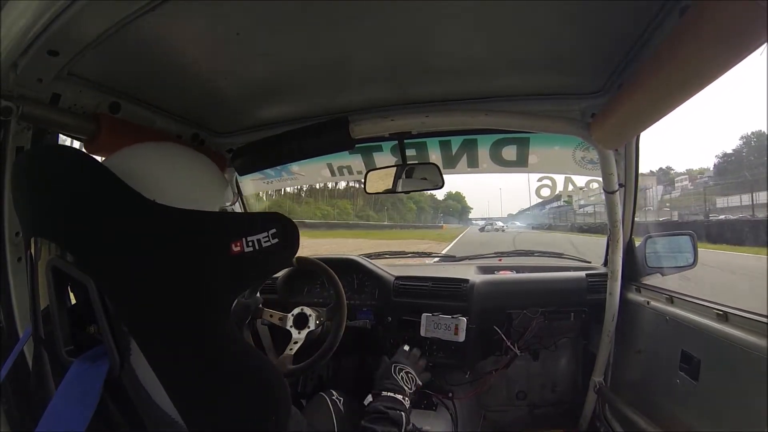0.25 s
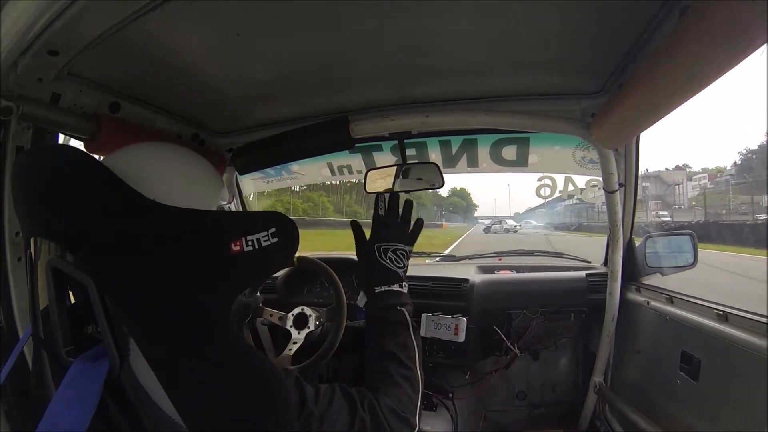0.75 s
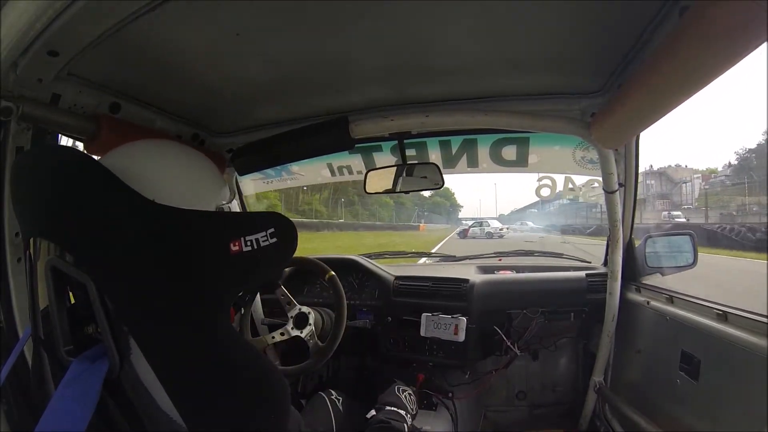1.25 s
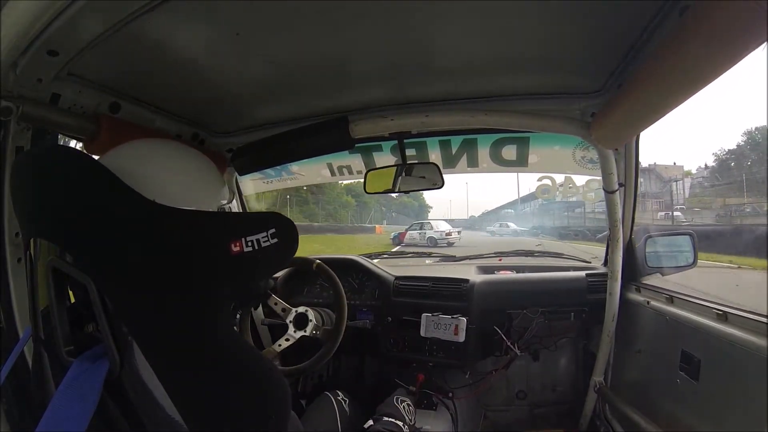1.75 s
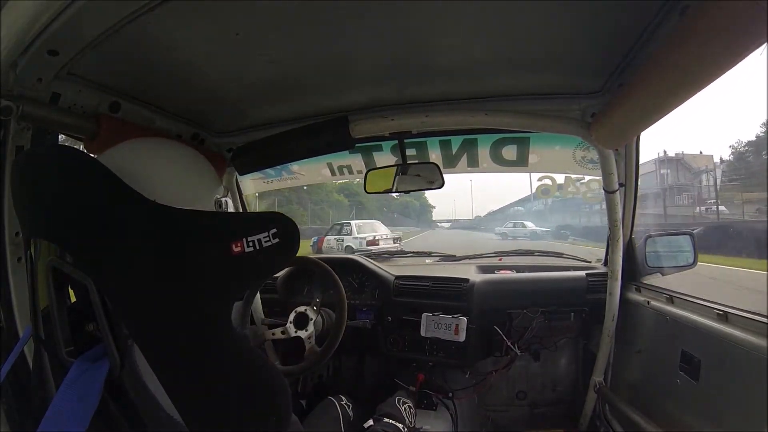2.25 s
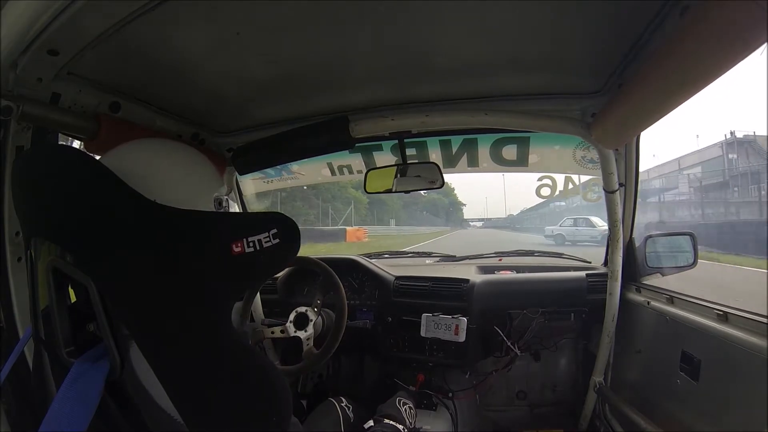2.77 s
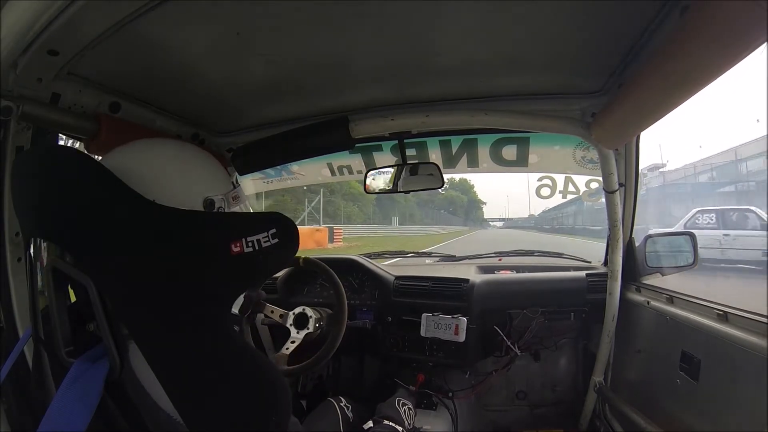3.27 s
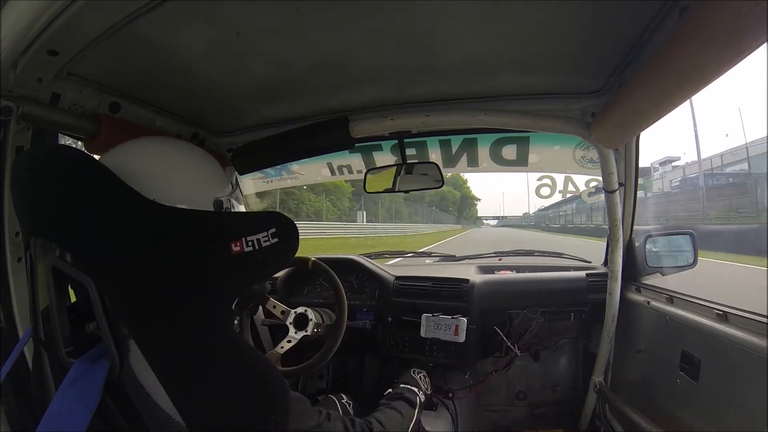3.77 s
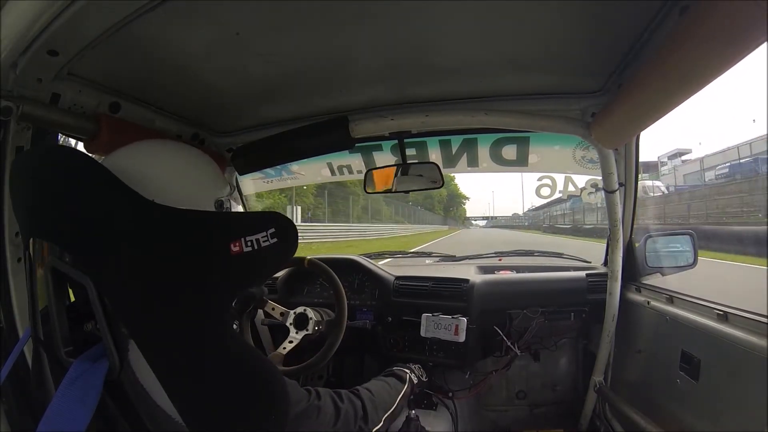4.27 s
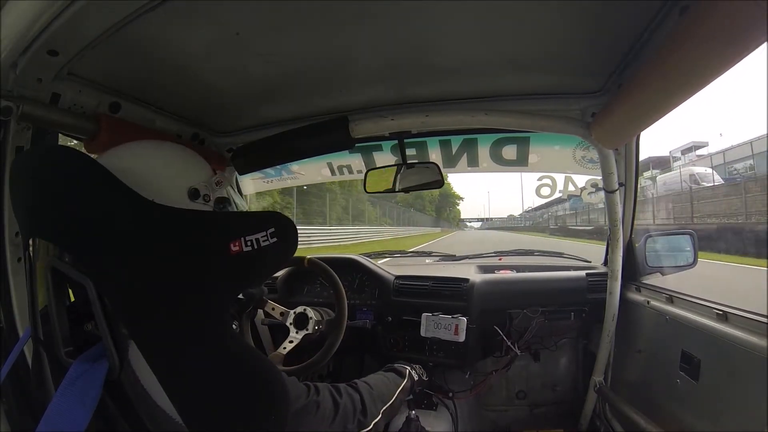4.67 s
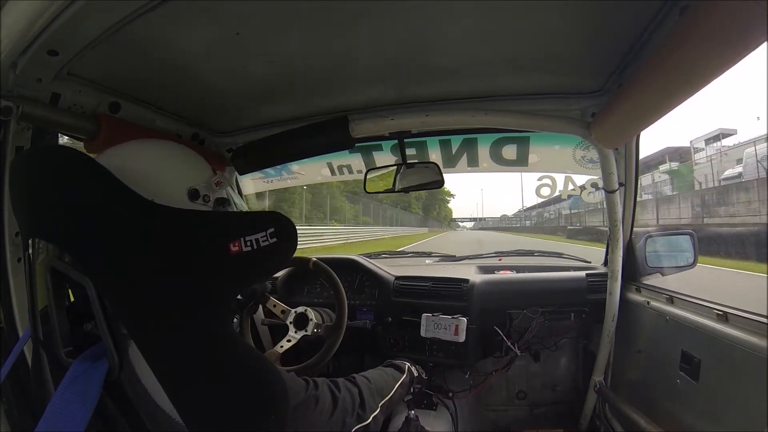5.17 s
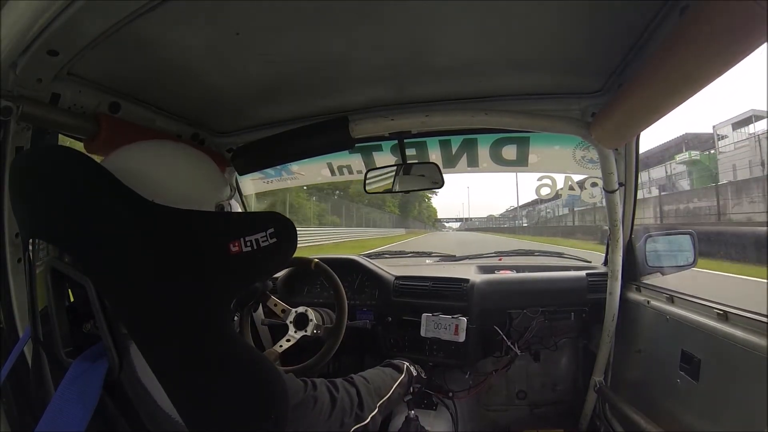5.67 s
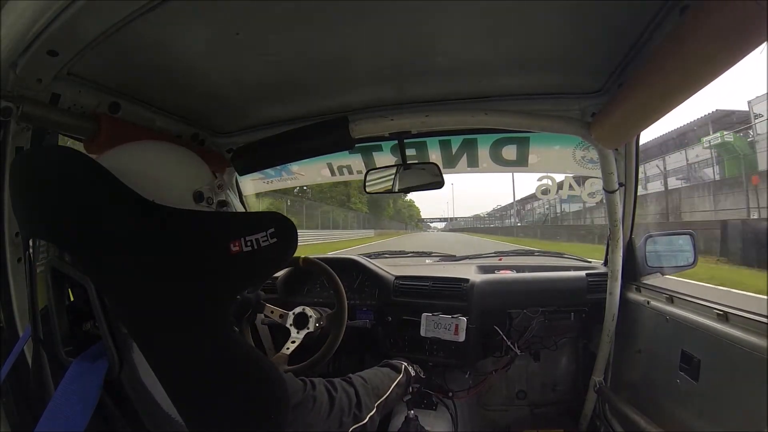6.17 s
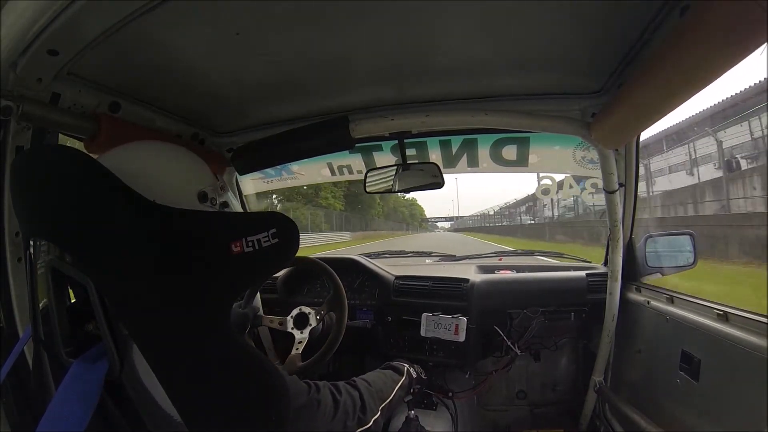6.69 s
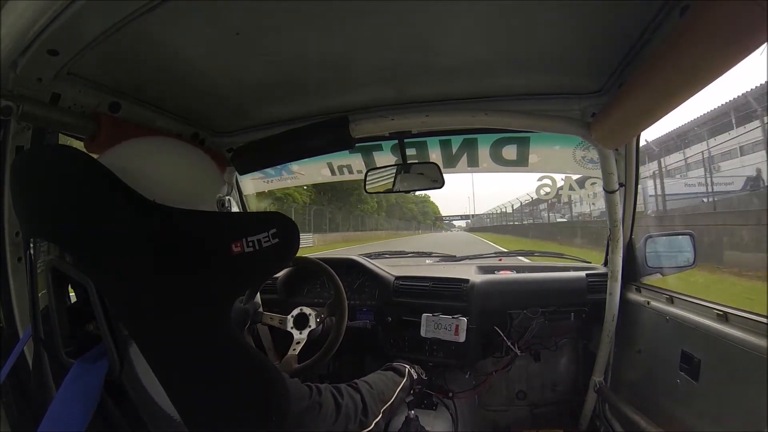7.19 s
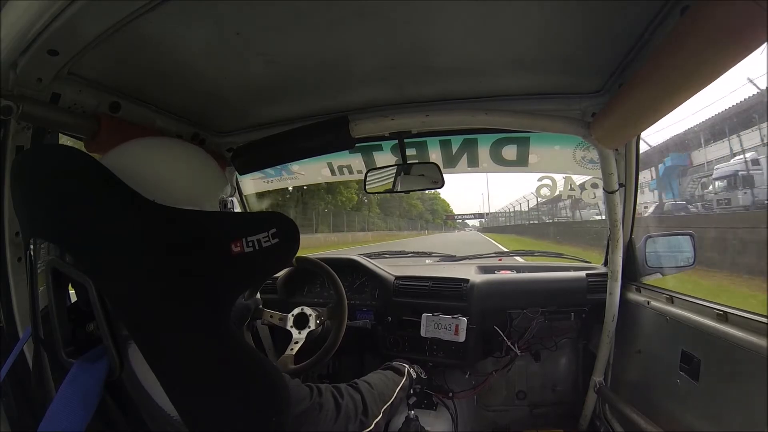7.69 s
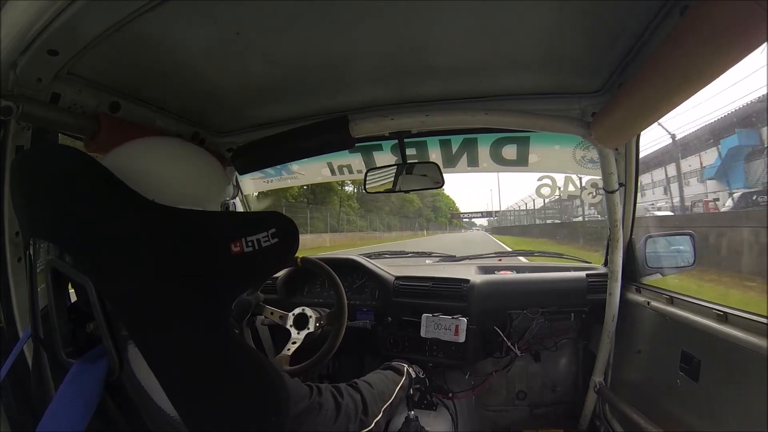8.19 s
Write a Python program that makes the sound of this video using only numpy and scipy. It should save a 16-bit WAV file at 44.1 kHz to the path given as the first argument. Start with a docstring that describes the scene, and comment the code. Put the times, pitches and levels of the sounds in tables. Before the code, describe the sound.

A booming race engine winds down under heavy road rumble and gusts of wind, picked up inside the bare, ringing cabin. After a faint, thin brake squeal and one dull knock, the throttle opens and grit strikes the wheel arches in sharp ticks and clangs. The revs jump, dip for a gear change, then climb steadily with a bright clatter as the road noise eases and everything fades away.

```python
"""A six-cylinder race engine, heard inside the stripped car: it slows for a bend, picks up, blips,
changes gear and pulls away hard. Exhaust orders sweep the cabin's standing waves. Tyre roar and a
bright rattle (tyre hiss while slowing, then engine clatter) ring the bare panels while wind buffets
through the open window. Grit strikes the wheel arches, a brake squeals briefly and the driveline
knocks once. The sound fades out at the end."""
import sys
import numpy as np
from scipy import signal
from scipy.fft import rfft, irfft, next_fast_len
from scipy.io import wavfile
from scipy.ndimage import uniform_filter1d

SR = 44100
rng = np.random.default_rng(int(sys.argv[2]) if len(sys.argv) > 2 else 0)


def waveform_to_disk(signal):
    """Save audio, clipped to [-1, 1], as 16-bit WAV at the path in sys.argv[1]."""
    frames = np.transpose(np.atleast_2d(signal))
    scaled = np.clip(frames, -1, 1) * 32767
    samples = np.round(scaled).astype(np.int16)
    wavfile.write(sys.argv[1], SR, samples)


N = 372204
T = np.arange(N) / SR


def undb(db):
    """Decibels to gain."""
    return 10 ** (np.asarray(db) / 20)


def unit(x):
    """Scale to rms 1."""
    return x / np.sqrt(np.mean(x ** 2))


def curves(table):
    """Each column of a table, interpolated over time."""
    times_s, *columns = np.transpose(table)
    return [np.interp(T, times_s, column) for column in columns]


def wander(rate_hz):
    """Smooth random drift, rms 1."""
    count = int(8 * rate_hz * N / SR) + 2
    f = np.arange(count // 2 + 1) * SR / N
    slow = irfft(rfft(rng.standard_normal(count)) / (1 + (f / rate_hz) ** 4), 4 * count)
    return np.interp(T, np.linspace(0, N / SR, len(slow)), unit(slow))


def swell(start_s, end_s):
    """Rounded rise and fall."""
    return np.sqrt(np.abs(np.sin(np.pi * np.clip((T - start_s) / (end_s - start_s), 0, 1))))


def strike(at_s, t60_s, rise_s):
    """Impact envelope: linear rise, exponential decay."""
    age_s = np.maximum(T - at_s, 0)
    return np.minimum(age_s / rise_s, 1) * np.exp(-np.log(1000) * age_s / t60_s)


def peaks_db(f, resonances):
    """Summed resonance peaks and dips at frequencies f."""
    return sum(db / (1 + (2 * (f - centre_hz) / width_hz) ** 2) for centre_hz, width_hz, db in resonances)


def response_db(f, spectrum, resonances):
    """Smooth spectrum plus resonances at frequencies f."""
    hz, db = np.transpose(spectrum)
    return np.interp(np.log(f + 1), np.log(hz), db) + peaks_db(f, resonances)


def noise(spectrum, resonances=(), flutter=1):
    """White noise times flutter, through a minimum-phase filter; rms 1."""
    size = next_fast_len(N + SR // 2, real=True)
    f = np.arange(size // 2 + 1) * SR / size
    cepstrum = irfft(np.log(undb(response_db(f, spectrum, resonances))), size)
    cepstrum[1:size // 2] *= 2
    cepstrum[size // 2 + 1:] = 0
    drive = rng.standard_normal(N) * flutter
    return unit(irfft(rfft(drive, size) * np.exp(rfft(cepstrum)), size)[:N])


# Engine speed: t/s, firing rate/Hz
FIRING_RATE = [(0, 169.8), (.75, 140.8), (1.55, 120.6), (1.8, 109.7), (2.2, 108.8), (3.6, 123.5),
               (3.8, 138.2), (3.95, 137.3), (4.08, 132.3), (4.15, 137.9), (4.22, 175.4), (4.35, 198),
               (4.5, 212), (4.6, 205.6), (4.68, 187.2), (4.75, 179), (4.85, 185.9), (5, 188.8),
               (6.75, 233.4), (8.44, 272.5)]

def crank(lumpy_hz=0.6, jerk_s2=6e-5):
    """Firing rate and running firing count; rotation is least even at low or fast-changing revs."""
    firing_hz, = curves(FIRING_RATE)
    slew_hz_per_s = uniform_filter1d(np.abs(np.gradient(firing_hz)) * SR, SR // 8)
    wobble = lumpy_hz / firing_hz + jerk_s2 * slew_hz_per_s
    return firing_hz, np.cumsum(firing_hz * (1 + wobble * wander(30))) / SR


# Throttle presses: press/s, release/s, opening/0-1, bark/dB
PEDAL = [(2.11, 3.37, 0.71, 3.5), (3.66, 3.48, 0.7, 4.5), (4.175, 4.54, 0.56, 5), (4.66, 8.6, 0.84, -1.5)]

def throttle(down_s=0.04, up_s=0.22, bark_s=0.2):
    """Throttle opening, and the brief bark in dB after each press."""
    load, bark_db = 0, 0
    for press_s, release_s, opening, db in PEDAL:
        pressed = np.clip((T - press_s) / down_s, 0, 1)
        held = np.clip(1 - (T - release_s) / up_s, 0, 1)
        load += opening * pressed * held
        bark_db += db * swell(press_s, min(press_s + bark_s, release_s + up_s))
    return load, bark_db


# Strongest exhaust orders: order/(firing rate / 6), coasting level/dB, full-throttle level/dB
BOOM_ORDERS = [(3, -34, -48), (6, -29, -23.5), (8, -36, -44), (9, -40, -44), (12, -36, -29.5),
               (16, -55, -44), (18, -42.5, -34), (24, -49, -36.5)]
# Cabin standing waves and nulls: f/Hz, width/Hz, gain/dB
CABIN_WAVES = [(89.8, 29, 12.5), (118.4, 8, 6.5), (139.8, 9.3, 15.5), (161.8, 26.4, -22.5), (202, 21, 4.5),
               (219.4, 12.3, 9), (224.5, 2.2, -17.5), (268.6, 31, 6), (323.3, 7.9, 6), (376, 9, 4),
               (405.3, 19, 7.5), (425, 20, -15), (515.5, 100, 10.5), (530.4, 5.6, -20), (547, 9.7, 8.5),
               (640, 21, 4.5), (694, 24, 10.5), (749, 33, -11), (900, 33, 12), (993, 18, 8)]
# Orders that drone briefly: start/s, end/s, order/(firing rate / 6), peak level/dB
DRONES = [(0, 0.523, 8, -23), (.62, 1.006, 6, -22.5), (1.208, 1.617, 9, -21.5), (1.55, 2.1, 3, -23),
          (2.144, 2.552, 22, -25), (2.148, 2.32, 18, -26), (2.276, 2.623, 15, -23.5), (2.718, 3.2, 24, -26),
          (3.712, 3.807, 12, -13.5), (4.103, 4.18, 12, -20), (4.65, 5.3, 3, -25), (4.702, 4.99, 9, -24),
          (5.037, 5.48, 7, -21.5), (5.5, 6.29, 4, -28), (6.3, 6.903, 14, -32), (6.877, 7.346, 12, -20)]

def exhaust_boom(firings, firing_hz, load, sputter_hz=30, waver_db=1.84):
    """Strong orders shift with load, swell in each standing wave and sputter more at low revs."""
    f = np.arange(SR // 8)
    cabin_db = peaks_db(f, CABIN_WAVES)
    power = {}
    for order, coast_db, full_db in BOOM_ORDERS:
        source_db = coast_db + load * (full_db - coast_db)
        lift_db = np.interp(order * firing_hz / 6, f, cabin_db)
        power[order] = undb(source_db + lift_db + waver_db * wander(4)) ** 2
    for start_s, end_s, order, db in DRONES:
        power[order] = power.get(order, 0) + (undb(db) * swell(start_s, end_s)) ** 2
    out, sputter_depth = 0, sputter_hz / firing_hz
    for order in power:
        tone = np.sin(2 * np.pi * (order * firings / 6 + rng.random()))
        out += np.sqrt(2 * power[order]) * (1 + sputter_depth * wander(25)) * tone
    return out


# Cabin air and panel resonances and dips: f/Hz, width/Hz, gain/dB
CABIN_MODES = [(87.8, 27, 10), (121, 16, 0), (165, 17, -4), (220, 68, 5.5), (278.6, 8.2, 6.5),
               (320.2, 22.6, 11), (393.3, 47, 10), (415, 52, -5), (495, 45, 2.5), (545, 60, 3),
               (699, 22, 4), (770, 51, 1.5), (959, 41, 4), (1088, 31, 3), (1940, 570, 5), (2418, 49, 10.5),
               (2510, 65, 2), (2595, 20, 10), (3280, 300, 5.5), (5520, 510, 4.5)]
# Growl spectrum: f/Hz, level/dB
GROWL_SPECTRUM = [(30, -15.5), (65, 5.5), (100, -0.5), (140, 5.5), (230, 3.5), (330, -5), (520, 1),
                  (750, -4), (1050, -5.5), (1300, -14.5), (2000, -19.5), (2600, -20), (4000, -39)]
# Orders that stand out or sink: order/(firing rate / 6) -> gain/dB
ORDER_TRIM_DB = {2: 4, 3: -7, 4: -8.5, 7: -1.5, 8: -4.5, 11: -17.5, 13: -4.5, 14: 0.5, 16: 2.5, 20: 0, 22:
                 5, 26: 4.5, 27: -11, 28: 6, 30: 3.5, 42: 10, 52: 7, 54: -2}
# Exhaust pipe resonances: firing rate/Hz, width/Hz, gain/dB
PIPE_PEAKS = [(189, 16, 0.5), (230.3, 17, 6)]

def exhaust_growl(firings, firing_hz, load, coast_db=-28.5, load_db=4, mode_gap_hz=24, flicker_db=3):
    """Six unequal cylinders fill in the half orders; each rises and dips across the cabin's modes."""
    f = np.arange(SR // 8)
    softened_modes = [(hz, width_hz, 0.83 * db) for hz, width_hz, db in CABIN_MODES]
    gain = undb(response_db(f, GROWL_SPECTRUM, softened_modes))
    cycle = np.exp(2j * np.pi * firings / 6)  # one turn per six firings
    phasor, out = 1, 0
    for order in range(1, 80):
        phasor = phasor * cycle
        if order in (6, 9, 12, 18, 24):  # carried by the boom
            continue
        modes = rng.standard_normal((SR // 100, 2)) @ [1, 1j]
        direct = np.exp(2j * np.pi * rng.random())
        reflected = 0.63 * np.interp(f / mode_gap_hz, np.arange(len(modes)), modes)
        tone = phasor * np.interp(order * firing_hz / 6, f, gain * (direct + reflected))
        ignition_jitter = min(0.042 * order, 0.5) * wander(30)
        balance_db = ORDER_TRIM_DB.get(order, 0) + flicker_db * wander(5)
        out += (tone.real + ignition_jitter * tone.imag) * undb(balance_db)
    combustion_scatter = undb(0.87 * wander(60))
    level_db = coast_db + load_db * load + peaks_db(firing_hz, PIPE_PEAKS)
    return undb(level_db) * unit(out * np.sqrt(firing_hz) * combustion_scatter)


# Bright rattle spectrum: f/Hz, level/dB
RATTLE_SPECTRUM = [(300, -8.5), (900, 4.5), (1500, 1), (2200, -0.5), (3000, -7), (4000, -13), (5000, -23),
                   (6000, -26.5), (7200, -30), (9000, -29.5), (11300, -35), (12300, -37.5), (15000, -43.5)]
# Bright rattle before the throttle's gain: t/s, level/dB
RATTLE_LEVELS = [(0, -29), (.5, -29), (1.9, -32.5), (2.2, -30), (3.1, -32), (3.6, -27.5), (4.05, -33),
                 (4.3, -30), (4.75, -33.5), (5.3, -32), (5.9, -34), (6.6, -31), (7.2, -33.5), (8.44, -32.5)]

def bright_rattle(firings, load, load_db=2.5, flicker_db=0.5):
    """Bright rattling noise: tyre hiss while slowing, then engine clatter under throttle."""
    base_db, = curves(RATTLE_LEVELS)
    firing_throb = 1 + 0.11 * np.cos(2 * np.pi * firings)
    crank_throb = 1 + 0.05 * np.cos(2 * np.pi * firings / 3)
    flutter = firing_throb * crank_throb * undb(flicker_db * wander(45))
    return undb(base_db + load_db * load) * noise(RATTLE_SPECTRUM, CABIN_MODES, flutter)


# Intake hiss spectrum: f/Hz, level/dB
HISS_SPECTRUM = [(3000, -23), (5600, -4), (7500, -18.5), (9000, -1), (10200, -8.5), (11200, 3),
                 (12200, -15.5), (15000, -14)]

def intake_hiss(load, bark_db, coast_db=-71, load_db=7):
    """Air hisses past the throttle, louder as it opens."""
    return undb(coast_db + load_db * load + bark_db) * noise(HISS_SPECTRUM)


# Road and air noise: t/s, tyre level/dB, wind level/dB
ROAD_LEVELS = [(0, -19.5, -16), (1.1, -21, -14), (1.9, -23, -19.5), (2.15, -20, -19.5), (2.45, -23.5, -20),
               (2.75, -21.5, -17), (3.3, -25, -17), (3.8, -20, -16.5), (4.05, -25.5, -18),
               (4.55, -24, -20.5), (4.9, -27, -27.5), (6.2, -30, -29.5), (6.7, -29, -28),
               (7.4, -36.5, -30.5), (8.44, -37, -35)]
# Tyre spectrum: f/Hz, level/dB
TYRE_SPECTRUM = [(40, -15.5), (90, -4), (200, 1.5), (330, -5), (500, -6.5), (800, -9), (1150, -11.5),
                 (1500, -20.5), (2500, -28.5), (5000, -38), (15000, -101.5)]

def tyre_roar(flutter_db=0.54):
    """Rolling noise rings the bare cabin."""
    level_db, _ = curves(ROAD_LEVELS)
    return undb(level_db) * noise(TYRE_SPECTRUM, CABIN_MODES, undb(flutter_db * wander(25)))


# Buffet spectrum: f/Hz, level/dB
WIND_SPECTRUM = [(10, -14.5), (22, -2.5), (31, 3.5), (45, -3), (60, -6.5), (85, -5), (130, -14.5),
                 (250, -20), (800, -82)]

def wind_buffet(gust_db=1.43, gust_hz=9):
    """Low gusts through the open window."""
    _, level_db = curves(ROAD_LEVELS)
    return undb(level_db + gust_db * wander(gust_hz)) * noise(WIND_SPECTRUM)


# Stone tick spectrum: f/Hz, level/dB
GRIT_SPECTRUM = [(500, -24.5), (2000, -15.5), (4000, 1.5), (6000, -7), (9000, -6), (12000, -10),
                 (15000, -17)]
# Wheel-arch clang spectrum: f/Hz, level/dB
ARCH_SPECTRUM = [(300, -20), (1300, 1.5), (2100, 7), (3000, 6), (4200, -4.5), (6000, -22.5), (12000, -32.5),
                 (15000, -45)]
# Wheel-arch and floor-pan resonances: f/Hz, width/Hz, gain/dB
PANEL_MODES = [(1980, 130, 11), (2506, 50, 12), (2700, 35, -9), (2970, 63, 0.5), (5580, 220, 10)]
# Stone hits: t/s, tick level/dB, tick f/Hz, clang level/dB, t60/s
STONE_HITS = [(1.200, -51, 11000, -60, 0.094), (1.240, -54, 9500, -60, 0.13), (1.686, -35, 5560, -50, 0.1),
              (1.797, -46, 6800, -52, 0.17), (2.137, -51, 11000, -34, 0.13),
              (2.187, -43, 6800, -27.5, 0.18), (2.717, -32, 10500, -32, 0.16),
              (2.727, -34, 6020, -11, 0.15), (2.823, -39, 5900, -24.5, 0.24), (3.033, -44, 8310, -49, .09),
              (3.678, -24.5, 4500, -13.5, 0.19), (3.788, -37.5, 7500, -21, 0.099),
              (3.855, -39.5, 4500, -28.5, 0.2)]

def stones(rise_s=0.0033, rattle_db=0.5, tick_q=1.9):
    """Each stone ticks on the underbody at its own pitch and rattles the wheel arch."""
    grit = noise(GRIT_SPECTRUM, PANEL_MODES)
    arch = noise(ARCH_SPECTRUM, PANEL_MODES)
    out = 0
    for at_s, tick_db, tick_hz, clang_db, t60_s in STONE_HITS:
        ping = unit(signal.lfilter(*signal.iirpeak(tick_hz, tick_q, fs=SR), grit))
        tick = unit(ping + 0.59 * grit)
        out += strike(at_s, t60_s, rise_s) * (undb(tick_db) * tick + undb(clang_db) * arch)
    return out * undb(rattle_db * (wander(200) - 0.5))


def brake_squeal(start_s=1.26, end_s=1.46, pitch_hz=10480, level_db=-59):
    """A disc sings thinly, wavering in level and pitch."""
    envelope = undb(level_db + 3.6 * wander(30)) * swell(start_s, end_s)
    hz = pitch_hz * (1 + 0.0028 * wander(150))
    return envelope * np.sin(2 * np.pi * np.cumsum(hz) / SR)


# Driveline knock: t/s, level/dB
KNOCK_HITS = [(2.084, -15.5)]
# Knock spectrum: f/Hz, level/dB
KNOCK_SPECTRUM = [(100, -15), (350, -16), (600, 19), (1000, -20), (1600, -8), (3000, -19), (8000, -65)]

def driveline_knock(t60_s=0.25, rise_s=0.0023):
    """Slack takes up with a dull thud through the floor."""
    envelope = sum(undb(db) * strike(at_s, t60_s, rise_s) for at_s, db in KNOCK_HITS)
    return envelope * noise(KNOCK_SPECTRUM, CABIN_MODES)


def scene(fade_s=3.24):
    """Engine, road and wind from behind the seats; mono, with a closing fade."""
    firing_hz, firings = crank()
    load, bark_db = throttle()
    exhaust = exhaust_boom(firings, firing_hz, load) + exhaust_growl(firings, firing_hz, load)
    mix = undb(bark_db) * exhaust + bright_rattle(firings, load) + intake_hiss(load, bark_db)
    mix += tyre_roar() + wind_buffet() + stones() + driveline_knock() + brake_squeal()
    fade = np.clip((N / SR - T) / fade_s, 0, 1)
    return (fade * mix)[None]


def record(dry, ceiling=0.85, cutoff_hz=15000):
    """Soft limit on the loudest peaks, then a steep low-pass."""
    rounded = dry / (1 + (dry / ceiling) ** 8) ** (1 / 8)
    return signal.sosfilt(signal.ellip(8, 0.2, 80, cutoff_hz, fs=SR, output="sos"), rounded)


dry = scene()
out = record(dry)
waveform_to_disk(out)
```